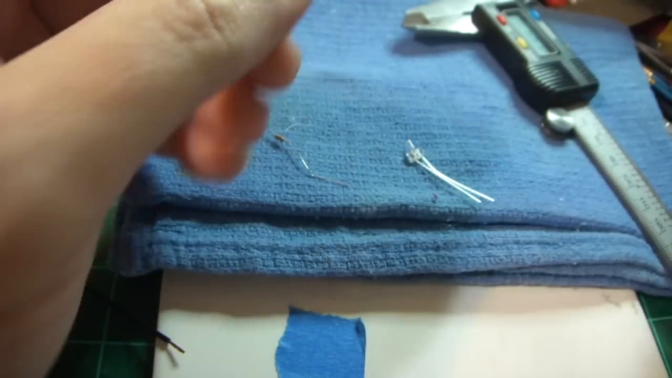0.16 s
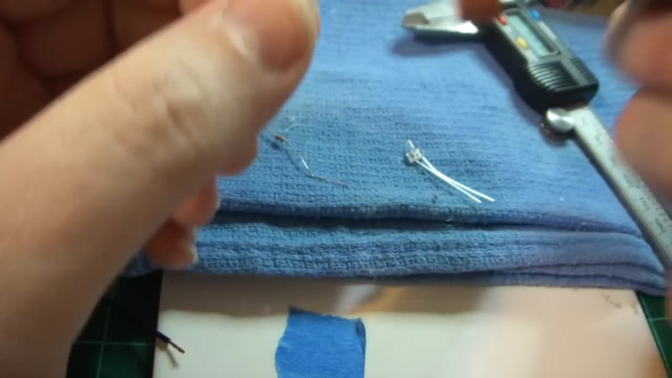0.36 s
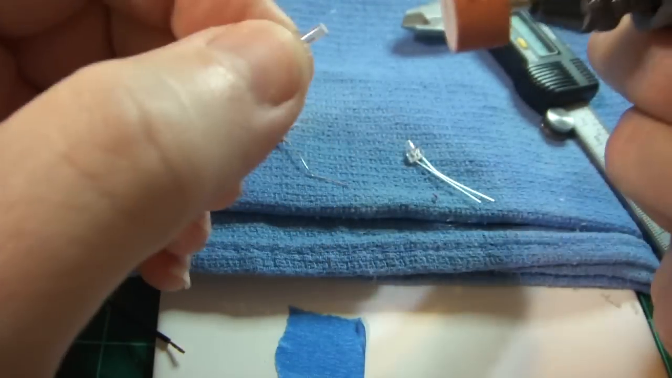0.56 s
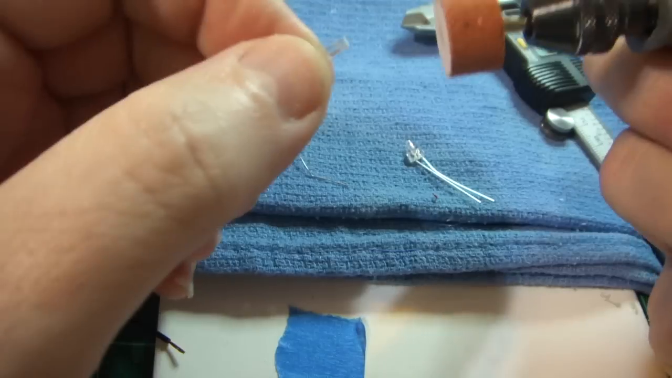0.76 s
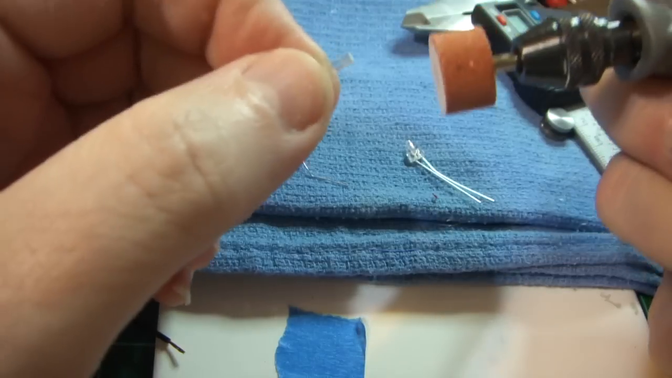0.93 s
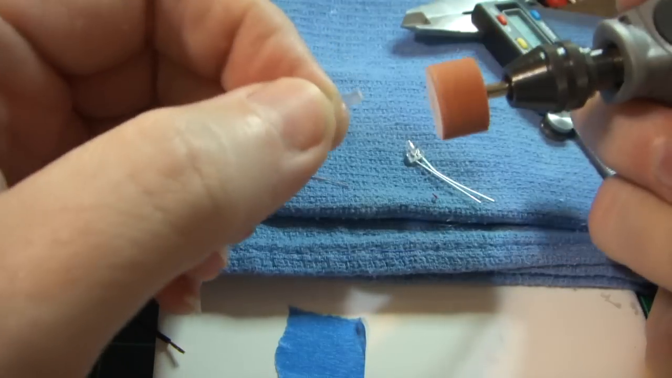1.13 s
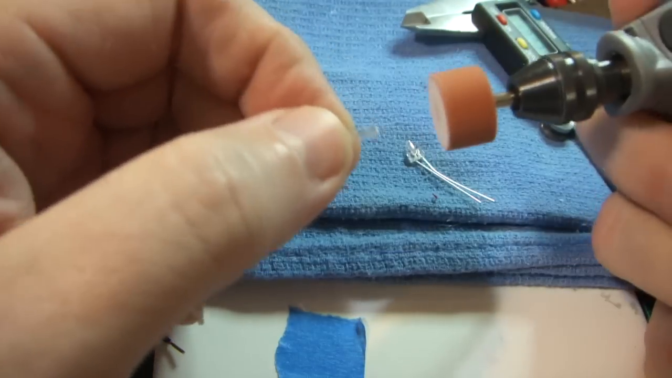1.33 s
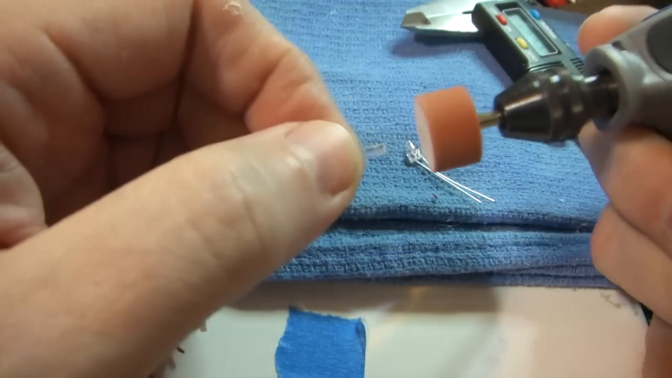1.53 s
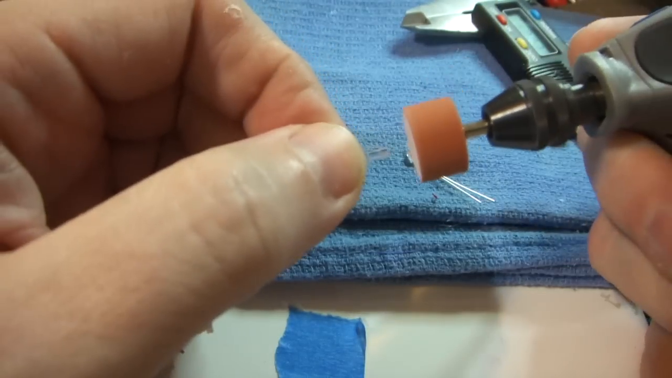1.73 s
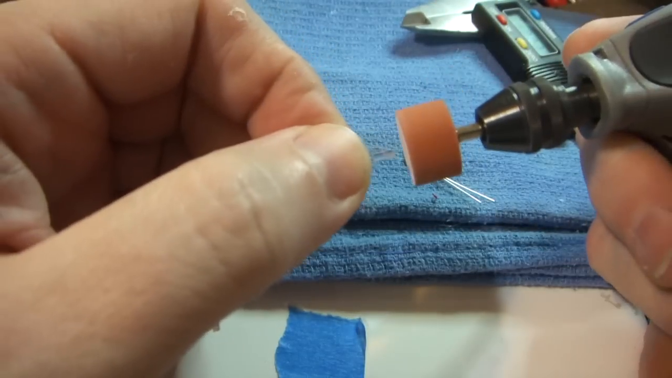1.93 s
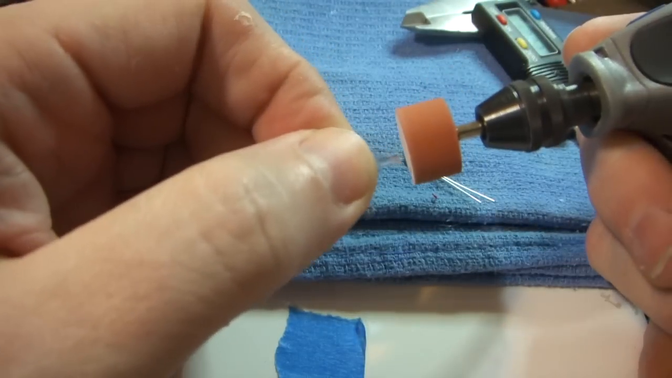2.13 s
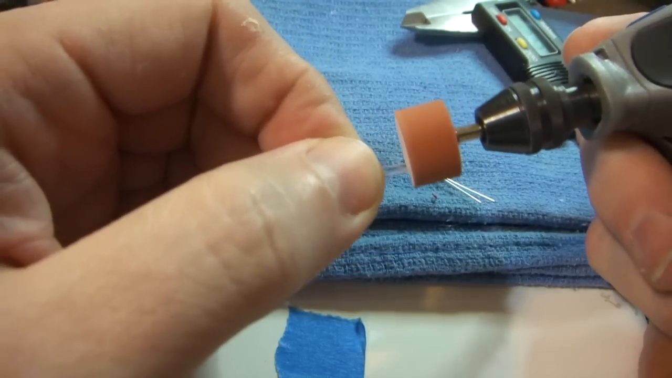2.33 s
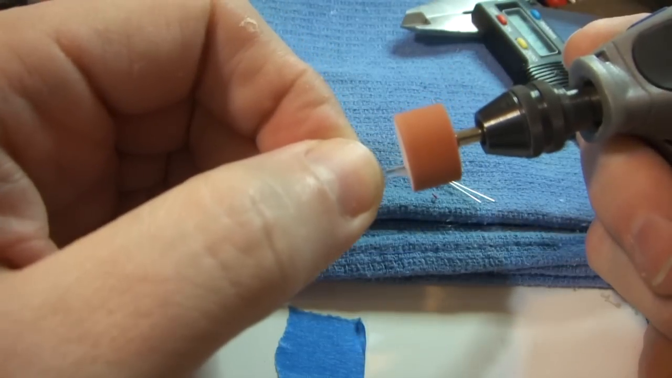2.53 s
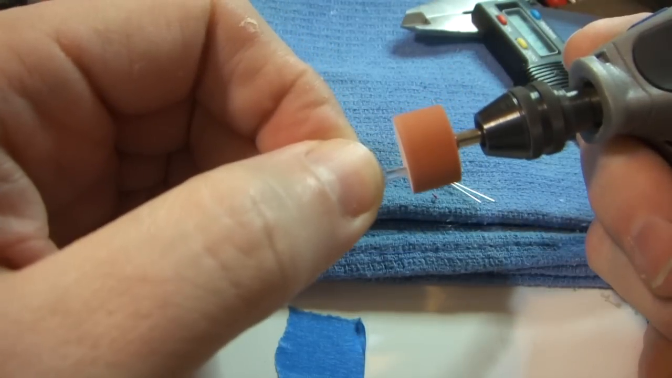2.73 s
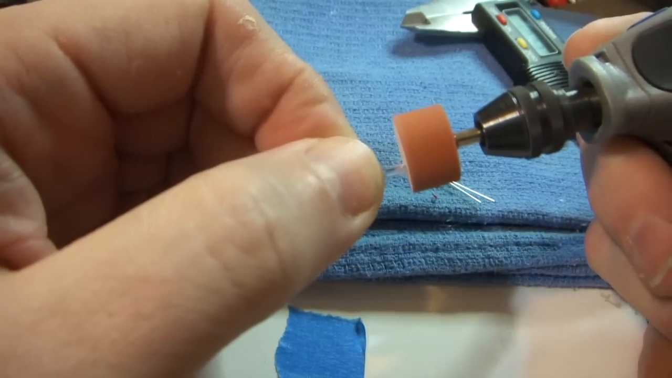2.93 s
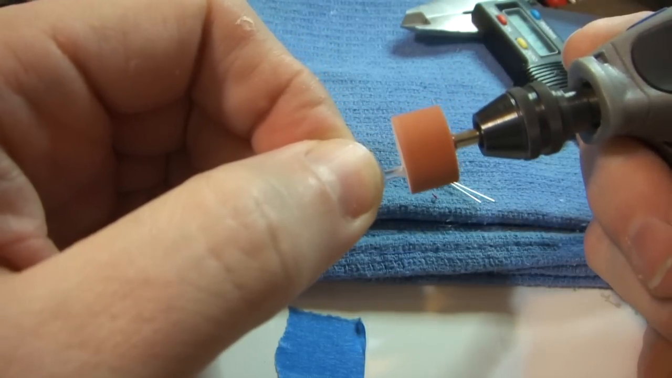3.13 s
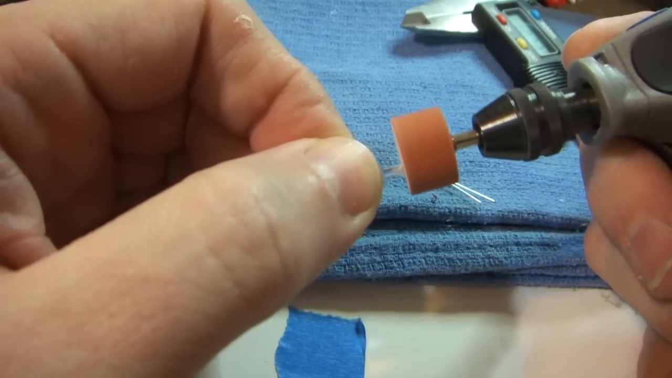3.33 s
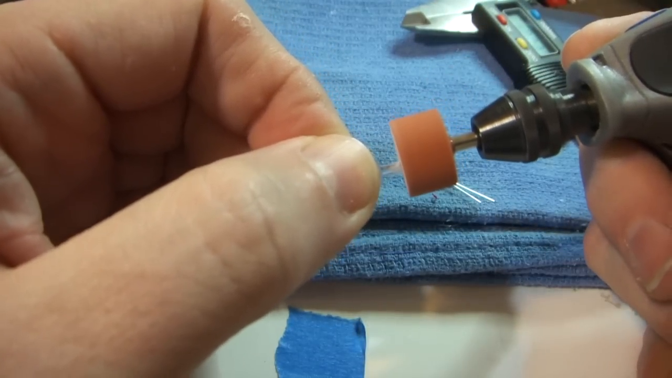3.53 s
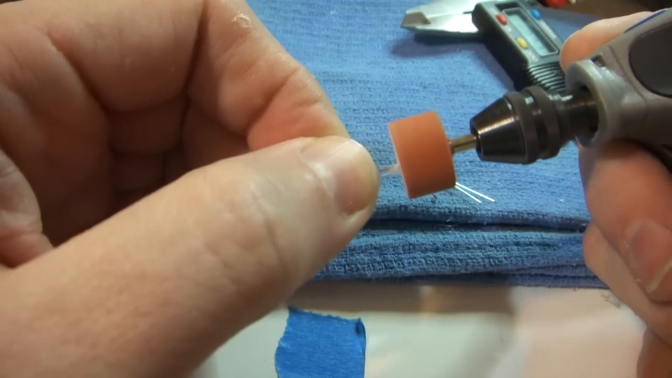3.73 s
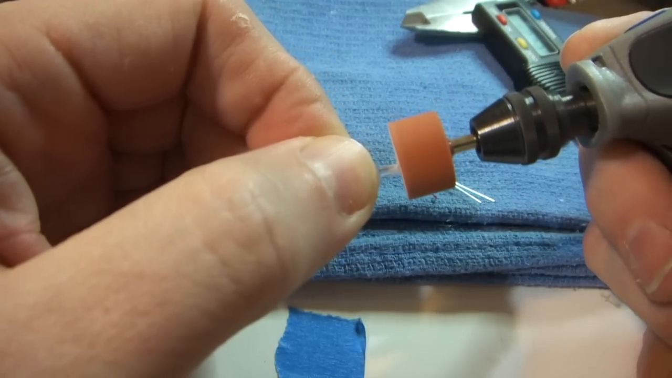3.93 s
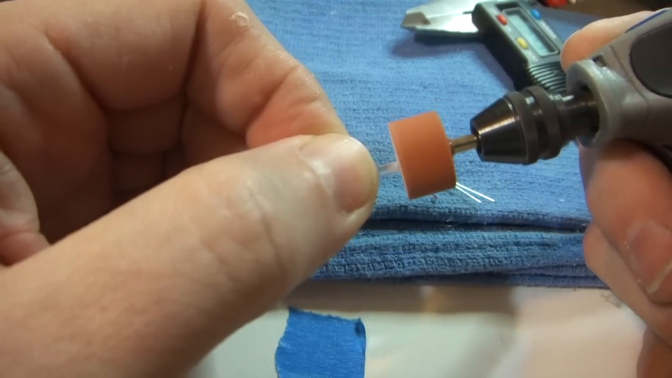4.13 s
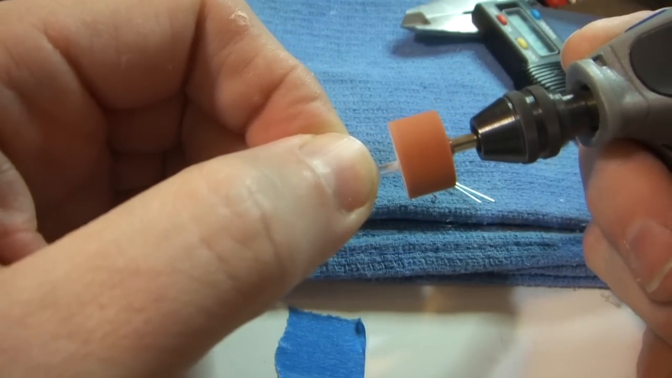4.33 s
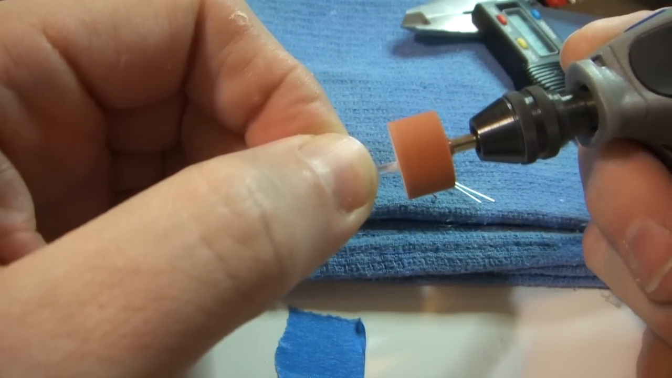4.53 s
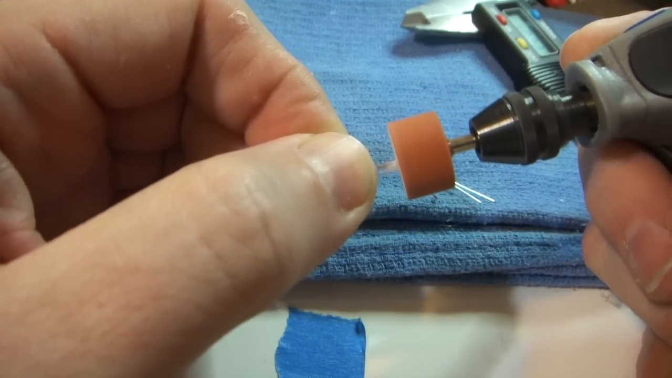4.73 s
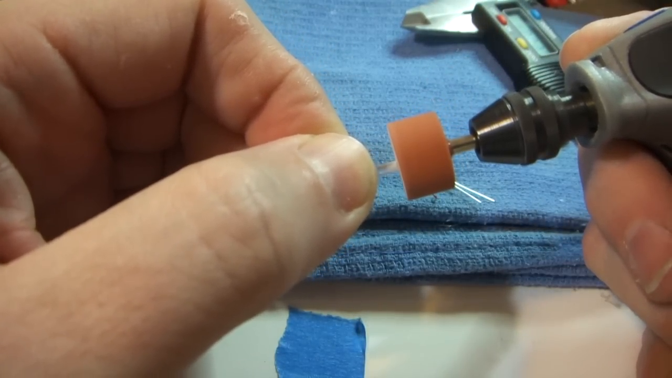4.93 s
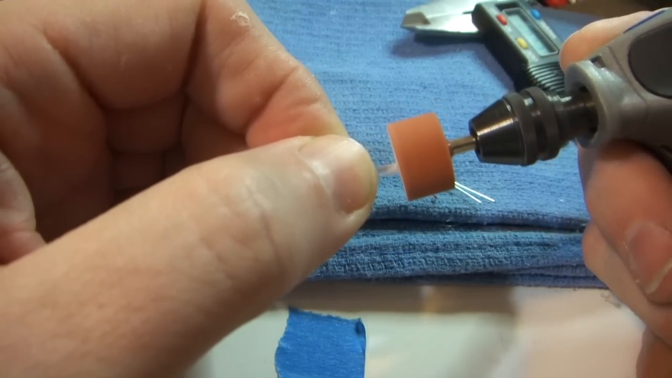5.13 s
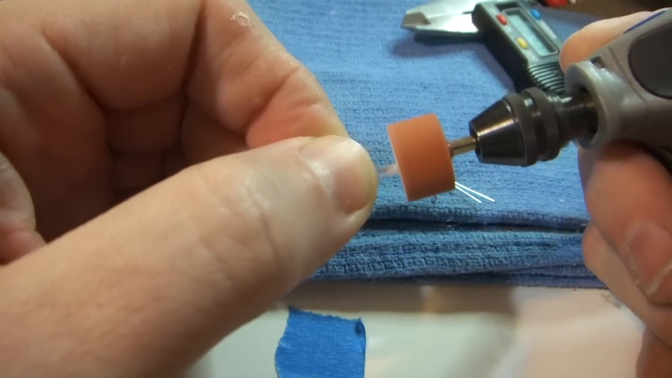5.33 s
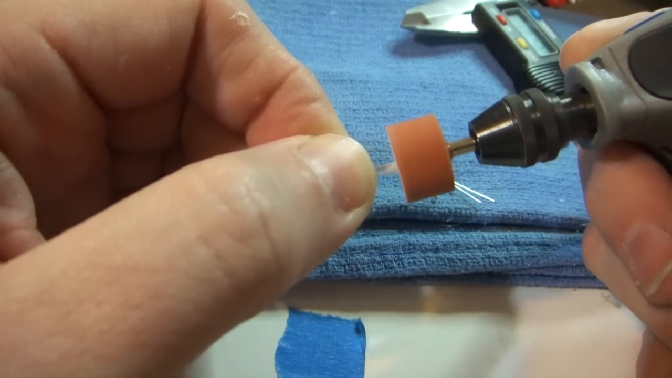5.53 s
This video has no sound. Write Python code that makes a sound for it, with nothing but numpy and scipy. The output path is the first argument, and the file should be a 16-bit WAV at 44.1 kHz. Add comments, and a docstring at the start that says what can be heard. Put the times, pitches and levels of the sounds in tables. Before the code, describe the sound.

A small rotary tool clicks on, whines up to speed, then its abrasive drum grinds a thin plastic stem with a buzzing, squealing rasp.

```python
"""On a work bench in a small room, close to the microphone, a small rotary tool starts up and grinds.
Fingers rustle as filtered noise, and button and fingernail clicks ring damped modes. The chopped motor current
whines in sum and difference lines that rise as the rotor spins up, while brushes and cooling air hiss.
The abrasive drum, slightly out of true, bites a thin plastic stem once a turn: each bite is a puff of grit noise
and a short burst of stick-slip squeals, and the drag of the stem slows the rotor."""
import sys
import numpy as np
from scipy import signal
from scipy.fft import rfft, irfft, next_fast_len
from scipy.io import wavfile
from scipy.ndimage import uniform_filter1d, map_coordinates

SR = 44100
rng = np.random.default_rng(int(sys.argv[2]) if len(sys.argv) > 2 else 0)


def master(y):
    """Save y as 16-bit WAV."""
    cut = np.clip(np.atleast_2d(y).T, -1, 1)
    pcm = np.round(cut * 32767)  # scale
    wavfile.write(sys.argv[1], SR, pcm.astype(np.int16))


N = 250047
TIME = np.arange(N) / SR
BINS_HZ = np.maximum(np.fft.rfftfreq(2 * next_fast_len(N // 2 + 4000), 1 / SR), 1)
SWITCH_ON_S, TOUCH_S = 1.056, 2.695
BITE_TURN = .944   # rotor angle at a bite's centre, in turns


def from_db(db):
    """Logarithmic level to amplitude gain: 20 dB is a factor of ten."""
    return 10 ** (np.asarray(db) / 20)


def rms_one(x):
    """Normalise the root-mean-square amplitude to 1."""
    return x / np.sqrt(np.mean(np.abs(x) ** 2) + 1e-20)


def in_time(rows):
    """Linear interpolation: each column of a curve, at every sample."""
    s, *columns = np.transpose(rows)
    return [np.interp(TIME, s, c) for c in columns]


def at_bins(points):
    """Interpolation over log frequency: a short spectrum joined by straight lines."""
    hz, value = np.transpose(points)
    return np.interp(np.log(BINS_HZ), np.log(hz), value)


def filtered(x, response):
    """Linear filtering: multiplication by a frequency response."""
    size = 2 * (len(BINS_HZ) - 1)
    return irfft(rfft(x, size) * response, size)[..., :N]


def coloured(x, spectrum):
    """Spectral shaping: filter x, with a skirt of 12 dB per octave below the lowest point; rms 1."""
    skirt = np.minimum(BINS_HZ / spectrum[0][0], 1) ** 2
    return rms_one(filtered(x, from_db(at_bins(spectrum)) * skirt))


def drift(knots_per_s):
    """Slow random modulation: random knots joined by straight lines; rms 1."""
    knots = rng.standard_normal(4000)
    return rms_one(np.interp(TIME * knots_per_s, np.arange(len(knots)), knots))


def resonate(x, hz, width_hz):
    """Heterodyne resonance: shift hz to zero, low-pass, shift back; the centre may move."""
    carrier = np.exp(2j * np.pi * np.cumsum(hz * np.ones(N)) / SR)
    r = np.exp(-np.pi * width_hz / SR)
    baseband = signal.lfilter([1 - r], [1, -r], x / carrier + 1e-18)
    return 2 * np.real(baseband * carrier)


def ring(taps, hz, t60):
    """Impulse response of a damped oscillator: a unit tap starts a decaying sine of height 1."""
    r, w = from_db(-60 / (t60 * SR)), 2 * np.pi * hz / SR
    return signal.lfilter([0, np.sin(w)], [1, -2 * r * np.cos(w), r * r], taps + 1e-18)


def puff(age, length):
    """Gaussian pulse: a brief rise and fall; both arguments in the same unit of time."""
    return np.exp(-.5 * (age / length) ** 2)


def swells(starts, lengths, heights, attack_s, release_s):
    """Trapezoidal envelopes: rise, hold and fall for each event; the highest counts at each instant."""
    envelopes = []
    for start, length, height in zip(starts, lengths, heights):
        rise = (TIME - start) / attack_s
        fall = 1 + (start + length - TIME) / release_s
        envelopes.append(height * np.clip(np.minimum(rise, fall), 0, 1))
    return np.max(envelopes, axis=0)


def ports(x):
    """Interaural-style cues: a near source reaches two ports with frequency-dependent level and phase."""
    # level difference of the two microphone ports: f/Hz, left - right level/dB
    balance = [(400, 0.5), (900, -4), (1250, -2.5), (1550, -2), (1950, 0.5), (2400, -1.5), (3000, -1),
               (3600, 5.5), (3950, -4.5), (4700, -1.5), (6250, 3.5), (6750, -1), (7300, -2), (8200, -1),
               (9400, -2)]
    # phase difference of the ports: f/Hz, lead of the left/rad
    phase_lead = [(400, 0.5), (1500, 0.39), (2100, -1), (3000, -1), (4000, -1.24), (4800, 1.5), (5200, -2),
                  (6000, 1.3), (7000, -2.5), (7400, 1.4), (8400, -1.36), (9400, -1.97)]
    side = np.array([[1], [-1]])
    gain = from_db(side * at_bins(balance) / 2)
    gain = gain / np.sqrt(np.mean(gain ** 2, axis=0))   # keep the mean power of the two ports
    return filtered(x, gain * np.exp(.5j * side * at_bins(phase_lead)))


def room_noise(level_db=-42):
    """Mid-side noise field: a steady low rush, its side part weakest in the middle of the spectrum."""
    # spectrum of the room noise: f/Hz, relative level per Hz/dB
    room_colour = [(25, -30), (50, -13), (80, -10.5), (120, 2), (155, -2.5), (205, 2.5), (260, -2.5),
                   (345, 4.5), (430, -2), (720, 1.5), (1100, -5), (2000, -9.5), (4000, -16.5), (7000, -21),
                   (10400, -31)]
    # stereo width of the room noise: f/Hz, side - mid level/dB
    room_width = [(30, 3), (70, -6), (150, -12), (500, -9), (1500, -6.5), (6000, 2)]
    mid, side = coloured(rng.standard_normal((2, N)), room_colour)
    side = filtered(side, from_db(at_bins(room_width)))
    return from_db(level_db) * (mid + side * [[1], [-1]])


def hands(grain_db=1.5, near_s=0.47, bump_s=1.325, bump_length_s=0.012, bump_db=-35, bump_hz=330,
          attack_s=0.016, release_s=0.018, fidget_db=-69):
    """Friction noise: skin rustles on plastic, a hollow hiss comes with the tool, the grip bumps once."""
    # fingers sliding on the work: start t/s, length/s, level/dB
    slides = [(0.06, 0.072, -49), (0.155, 0.15, -40), (0.51, 0.043, -48)]
    # spectrum of the rustle: f/Hz, relative level per Hz/dB
    rustle_colour = [(880, -34), (1500, -12), (2340, 0), (3080, -9), (3360, -5.5), (4290, -7), (7370, -7.5),
                     (10300, -10.5), (13400, -48), (22000, -120)]
    # resonances of the faint hollow hiss while the tool is near: f/Hz, width/Hz, rms level/dB
    hollow_modes = [(2100, 96, -52), (3450, 240, -58), (4080, 440, -55), (6740, 190, -68)]
    starts, lengths, slide_db = np.transpose(slides)
    sliding = swells(starts, lengths, from_db(slide_db), attack_s, release_s)
    sliding = sliding + from_db(fidget_db) * (TIME < SWITCH_ON_S)   # faint stirring until switch-on
    grains = rng.standard_normal(N) * from_db(grain_db * drift(600))
    rustle = sliding * coloured(grains, rustle_colour)
    hollow = sum(from_db(db) * rms_one(resonate(rng.standard_normal(N), hz, width))
                 for hz, width, db in hollow_modes)
    nearness = np.clip((TIME - near_s) / 0.055, 0, 1)
    bump = rms_one(resonate(rng.standard_normal(N), bump_hz, 250)) * puff(TIME - bump_s, bump_length_s)
    return rustle + hollow * nearness + from_db(bump_db) * bump


def clicks(low_hz=2900, high_hz=7600, body_hz=1500, body_db=-15):
    """Modal synthesis: snaps ring a small plastic part, band-limited by soft contact, over a weak body."""
    # button and fingernail clicks before filtering: t/s, level/dB, brightness/(dB per octave about 4500 Hz)
    taps_table = [(0.4188, -26, 40), (0.5496, -3.5, 21), (0.5496, -15, 18), (0.905, -35, 26), (.9739, 0, 5)]
    # modes they excite: f/Hz, relative level/dB, decay time t60/s
    modes = [(3330, -13, 0.011), (4130, -11.5, 0.01), (4460, -15, 0.0093), (5830, -7.5, 0.00086),
             (7400, -38, .002)]
    s, level_db, brightness_db = np.transpose(taps_table)
    ringing = np.zeros(N)
    for hz, mode_db, t60 in modes:
        taps = np.zeros(N)
        tilt_db = brightness_db * np.log2(hz / 4500)
        taps[np.round(s * SR).astype(int)] = from_db(level_db + mode_db + tilt_db)
        ringing += ring(taps, hz, t60)
    band = signal.butter(4, [low_hz, high_hz], "band", fs=SR, output="sos")
    return signal.sosfilt(band, ringing) + from_db(body_db) * resonate(ringing, body_hz, 1500)


def rotor_speed(break_free_s=1.084, full_turns_per_s=199, inertia_s=1.27,
                governor_s=1.7, set_turns_per_s=96.15, settle_s=.2):
    """First-order inertia: an exponential run-up, a governed approach to set speed, less the drag."""
    # speed lost to the drag of the stem: t/s, loss/(turns per s)
    drag = [(2.7, 0.0), (2.8, 0.69), (3.0, 4.96), (3.15, 3.58), (3.4, 7.85), (3.7, 12.2), (3.85, 11.31),
            (4.15, 10.93), (4.3, 12.61), (4.45, 13.26), (4.62, 16.59), (5.05, 18.79), (5.35, 21.02),
            (5.67, 27.37)]
    driven_s = np.clip(TIME, break_free_s, governor_s) - break_free_s
    run_up = full_turns_per_s * (1 - np.exp(-driven_s / inertia_s))
    settled = 1 - np.exp(-np.maximum(TIME - governor_s, 0) / settle_s)
    return run_up + settled * (set_turns_per_s - run_up) - in_time(drag)[0]


def whine(speed, turns, flicker_db=0.78, start_flicker_db=1.8, shake_turns=0.00072, swell_s=0.043,
          first_share=0.49, slow_speed=35, fast_speed=90, growth=5, housing_hz=1000, housing_width_hz=150,
          housing_db=36, thin_s=1.58, thin_length_s=0.18, thin_db=3.5):
    """Intermodulation: chopped current, cut by the commutator, sings in sum and difference lines."""
    # rate at which the speed control chops the current: t/s, f/Hz
    chop_rate = [(1.056, 1003), (1.13, 1055), (1.2, 1090), (1.3, 1127), (1.5, 1190), (1.6, 1219),
                 (1.7, 1252.6)]
    # whine lines, amplitude before the housing: multiple of chop rate, multiple of turn rate,
    # level/dB starting, level/dB running free, level/dB loaded
    lines = [(0, 1, -49, -55, -46), (0, 3, -65, -49, -47.5), (0, 9, -35, -29.5, -27),
             (0, 10, -49, -48.5, -60), (0, 11, -49, -44.5, -49), (0, 12, -32, -44, -60),
             (0, 15, -24, -39.5, -54), (0, 16, -41, -54, -31), (1, -3, -26, -31, -28.5),
             (1, -2, -40, -55.5, -43.5), (1, 0, -34, -38.5, -39), (1, 3, -28, -29, -31),
             (1, 6, -67, -42, -38.5), (2, -6, -61, -51, -41.5), (2, -3, -38, -40, -41),
             (2, 0, -31, -39.5, -40.5), (2, 3, -52, -33, -43), (2, 9, -46, -55.5, -49),
             (3, -9, -47, -44, -46), (3, -3, -37, -40.5, -39.5), (3, 0, -34.5, -50, -53),
             (3, 3, -41, -32.5, -35), (4, -3, -57, -59, -50), (4, 0, -44, -43, -45),
             (4, 3, -49.5, -47, -45.5), (5, -6, -46, -60, -54), (5, -3, -64, -42, -45),
             (5, 0, -46, -45.5, -51), (5, 3, -41, -43.5, -59), (5, 6, -56, -38, -50),
             (6, -3, -54, -64, -53), (6, 0, -45, -54, -56), (6, 3, -41.5, -57, -57),
             (7, -3, -47, -52.5, -47), (7, 0, -48, -46, -64), (7, 3, -46, -50, -59), (8, 0, -47, -74, -69)]
    # how the housing colours the whine: f/Hz, gain/dB
    housing = [(2000, 0), (2150, 1.5), (2900, 0), (3200, 0.5), (3550, -2), (4250, -2.5), (4700, 8),
               (5050, -4.5), (5420, 6.5), (5720, -5), (6100, 0), (6700, -1.5), (7700, -5), (8400, 5),
               (8900, -3)]
    chops = np.cumsum(in_time(chop_rate)[0]) / SR
    run_share = np.clip((speed - slow_speed) / (fast_speed - slow_speed), 0, 1)
    running = np.where(TIME > TOUCH_S, 1, run_share)
    load = (TIME > TOUCH_S) * (speed.max() - speed) / 22
    angle = turns + shake_turns * drift(60)
    age = np.maximum(TIME - SWITCH_ON_S, 0)
    # mechanical lines grow with speed; the chop's fundamental swells in, its overtones sooner
    mechanical = (speed / speed.max()) ** growth
    fundamental = np.minimum(age / swell_s, 1) ** 4
    overtones = np.minimum(age / 0.0044, 1) * np.minimum(first_share + age / 0.094, 1)
    onset = [mechanical, fundamental, overtones]
    out = np.zeros(N)
    for per_chop, per_turn, start_db, free_db, loaded_db in lines:
        m, k = round(per_chop), round(per_turn)
        # overtones flutter more during the run-up
        flutter_db = flicker_db + start_flicker_db * (1 - running) * (m > 1)
        level_db = start_db + running * (free_db - start_db) + load * (loaded_db - free_db)
        level_db = level_db + flutter_db * drift(40)
        if m > 1:   # the overtones thin out near the end of the run-up
            level_db = level_db - thin_db * puff(TIME - thin_s, thin_length_s)
        if m == 0:   # a mechanical line flares as it sweeps through the housing's main resonance
            detuning = (k * speed - housing_hz) / housing_width_hz
            level_db = level_db + housing_db * (1 - running) / (1 + detuning ** 2)
        cycles = m * chops + k * angle
        out += from_db(level_db) * onset[min(m, 2)] * np.cos(2 * np.pi * (cycles + rng.random()))
    return filtered(out, from_db(at_bins(housing)))


def brushes(speed, turns, hiss_db=-32.0, buzz_db=-39, diffuse_db=-41, growth=0.75, throb=0.15):
    """Friction noise growing with speed: a hiss throbs thrice a turn, a scratch repeats every turn."""
    # spectrum of brushes and cooling air: f/Hz, relative level per Hz/dB
    brush_colour = [(200, -55), (600, -4), (1100, 2.5), (1900, 3.5), (2600, -4), (3300, 1.5), (3700, -3.5),
                    (4400, 6), (5200, -6), (6300, 2.5), (7200, 0.5), (8450, 0), (8850, -1), (9500, 0.5),
                    (10400, -15.5)]
    gain = (speed / speed.max()) ** growth
    track = rng.standard_normal(SR // 96)   # the scratch of one turn
    buzz = coloured(np.interp(turns % 1, np.linspace(0, 1, len(track)), track), brush_colour)
    throbbing = 1 + throb * np.cos(6 * np.pi * turns)
    hiss = coloured(rng.standard_normal(N) * throbbing, brush_colour)
    diffuse = coloured(rng.standard_normal((2, N)), brush_colour)
    near = ports(from_db(hiss_db) * hiss + from_db(buzz_db) * buzz)
    return gain * (near + from_db(diffuse_db) * diffuse)


def bites(speed, turns, lead=0.332):
    """Phase locking to the rotor: each sample's bite number, and its time from that bite's centre in ms."""
    bite = np.floor(turns - BITE_TURN + lead).astype(int) + 1
    return bite, 1000 * (turns - BITE_TURN - bite + 1) / np.maximum(speed, 1)


def evened(x, bite):
    """Power normalisation: bring every bite to about the same rms of 1."""
    count = np.maximum(np.bincount(bite), 1)
    power = np.bincount(bite, x ** 2) / count
    return x / np.sqrt(uniform_filter1d(power[bite], size=128) + 1e-12)


def abrasive(turns, renew_per_s=9, fresh=0.75):
    """Cyclic noise: the same grains pass each turn, gradually giving way to others; chips add fresh noise."""
    grains = rng.standard_normal((256, SR // 84))
    position = [TIME * renew_per_s, turns % 1 * grains.shape[1]]
    track = map_coordinates(grains, position, order=3, mode="grid-wrap")
    return rms_one(track + fresh * rng.standard_normal(N))


def squeal(force, cycles, hz, width_hz, rough, slip_radians, turns, bite):
    """Forced resonance: a stick-slip tone, roughened by the abrasive, drives one mode of the stem."""
    slip = slip_radians * rng.standard_normal(bite.max() + 1)[bite]
    tone = np.sqrt(2) * np.cos(2 * np.pi * cycles + slip)
    scratch = rms_one(resonate(abrasive(turns), hz, width_hz))
    return resonate(force * (tone + rough * scratch), hz, width_hz)


def stem_squeal(speed, turns, width_hz=520, rough=0.28, rebound_ms=4.5, rebound_length_ms=1.1,
                slip_radians=0.18, stiffen_hz=370, stiff_ms=1.48, relax_ms=0.33,
                choke=0.72, choke_turn=0.3, choke_ms=0.65):
    """Stick-slip: sharp while the drum holds the stem, falling as it slips; rebound, then choked ring."""
    # low squeal of the stem: t/s, f/Hz, delay of the bite/ms, length of the bite/ms,
    # rebound level/dB and chafing level between bites/dB, both relative to the bite
    stem = [(2.72, 1890, 0.26, 1.1, -27, -24), (2.79, 2030, 0.46, 0.43, -19, -25),
            (2.86, 1950, 0.2, 0.73, -13, -22), (2.91, 1940, -0.29, 2.7, -2, -14),
            (2.96, 1880, 0.089, 1.4, -8, -18), (3.0, 1876, 0.85, 1.3, -21, -24),
            (3.15, 1847, 0.13, 1.44, -24, -30), (3.2, 1913, -1.5, 0.81, -2, -3),
            (3.28, 1910, -1.5, 1.4, -25, -18.5), (3.35, 1890, -0.97, 1.9, -7, -1),
            (3.42, 1860, -0.41, 1.8, -3, -10), (3.57, 1826, -.6, 2.2, -15, -6),
            (3.62, 1915, -1.8, 1.1, -17, -9), (3.68, 1763, 0.98, 1.3, -11, 1),
            (3.8, 1873, 1.4, 1.9, -17, -7), (4.06, 1790, 1.6, 0.81, -16, 1),
            (4.24, 1775, 0.014, 1.2, -8, 1), (4.32, 1850, -0.4, 1.1, -17, -20),
            (4.43, 1756, -0.77, 2, -19, -10), (4.55, 1817, 0.06, 1.1, -11, -24),
            (5.3, 1842, 0.64, 0.7, -10, -11)]
    bite, age_ms = bites(speed, turns)
    hz, delay_ms, length_ms, rebound_db, chafe_db = in_time(stem)
    force = puff(age_ms - delay_ms, length_ms) + from_db(chafe_db)
    force = force + from_db(rebound_db) * puff(age_ms - rebound_ms, rebound_length_ms)
    held = (np.minimum(delay_ms, length_ms / 2) - stiff_ms - age_ms) / relax_ms
    rise_hz = stiffen_hz * (1 + np.tanh(held / 2)) / 2
    # the phase is the time integral of the base pitch plus the falling rise
    cycles = (hz * age_ms - stiffen_hz * relax_ms * np.logaddexp(0, held)) / 1000
    # the returning drum touches the stem shortly before the next bite
    return_turn = (turns - BITE_TURN + choke_turn + .5) % 1 - .5
    return_ms = 1000 * return_turn / np.maximum(speed, 1)
    free = 1 - min(choke, 1) * puff(return_ms, choke_ms)
    tone = squeal(force, cycles, hz + rise_hz, width_hz, rough, slip_radians, turns, bite)
    return evened(free * tone, bite)


def grinding(speed, turns, grit_ms=1.47, grit_delay_ms=0.16, graze=0.16, grain_db=2, rasp_db=-11.5,
             rasp_ms=1.7, apart=0.6, grit_follows=0.77, catch_ms=0.66, bite_spread_db=0.68,
             slip_radians=0.47, chafe=0.025, tremor_db=0.2, tremor_per_s=25, grit_rest_db=-28.5):
    """Periodic contact: once a turn the drum catches the stem, grit crackles and the stem squeals."""
    # the hand pushes the stem into the drum: start t/s, length/s, rise of the low squeal level/dB,
    # rise of the upper squeals' level/dB (grit takes a share); rises below 0 have no effect
    pushes = [(2.664, 0.053, 11.5, -3.5), (2.743, 0.026, 9.5, 0), (2.82, 0.062, 8.5, 7.5),
              (2.87, 0.075, 8, 4), (2.93, 0.028, 11, 7), (3.006, 0.067, 8.5, -2.5), (3.094, 0.055, 8.5, -2),
              (3.186, 0.066, 4, 2), (3.239, 0.05, 9, 1.5), (3.258, 0.032, 11, 5.5), (3.372, 0.12, 5, 3.5),
              (3.491, 0.075, 10, 3.5), (3.555, 0.037, 3, 6.5), (3.615, 0.075, 3.5, 3), (3.725, 0.014, 0, 3),
              (3.871, 0.04, 1, 9), (3.947, 0.024, -4.5, 2.5), (4.064, 0.235, -2, 6),
              (4.16, 0.028, -0.5, 10), (4.235, 0.21, 7.5, 3), (4.41, 0.022, 0, 1.5), (4.461, 0.034, -7, 8),
              (4.5, 0.027, 4.5, 3.5), (4.699, 0.14, 0.5, 6), (4.752, 0.02, -6, 7), (4.904, 0.056, 5.5, 3.5),
              (4.949, 0.16, 3, 8), (5.252, 0.093, -2, 10.5), (5.395, 0.025, 4, 9), (5.462, .03, 1, 6.5),
              (5.489, 0.13, -12.5, 9)]
    # the hand eases off for a moment: t/s, length/s, drop of the upper squeals' level/dB (low squeal: half)
    eases = [(3.024, 0.006, 6), (3.083, 0.008, 8), (3.186, 0.015, 3.5), (3.607, 0.01, 2.5),
             (3.853, 0.019, 6.5), (4.055, 0.009, 4), (4.275, 0.007, 4), (4.492, 0.0072, 9),
             (4.676, 0.012, 5), (5.245, 0.012, 5)]
    # low squeal between pushes: t/s, level/dB
    stem_rest = [(2.7, -30.5), (3.1, -23), (3.2, -23), (3.4, -23), (3.57, -28), (3.8, -22), (4.18, -25.5),
                 (4.3, -27.5), (4.46, -29.5), (4.58, -21), (4.87, -25), (5.05, -30), (5.25, -25),
                 (5.55, -34), (5.67, -31)]
    # first catch of the drum on the stem: t/s, lead before the bite's centre/ms, strength relative to the bite
    first_catch = [(2.85, 2.4, 0.42), (3.25, 2.7, 0.55), (3.6, 1.8, 0.54), (4.1, 1.6, 0.43),
                   (4.5, 1.2, 1.6), (5.0, 1.2, 0.9), (5.5, 1.5, 0.58)]
    # spectrum of the abrasive grit: f/Hz, relative level per Hz/dB
    grit_colour = [(600, -7.5), (1300, -3), (2300, 2.5), (2700, 1), (3700, -5), (4600, 5.5), (5400, -6),
                   (6500, 7), (7050, 5.5), (8000, 5.5), (8800, 4), (9500, 13.5), (10400, -3)]
    # spectrum of the coarse rasp of a hard-pressed stem: f/Hz, relative level per Hz/dB
    rasp_colour = [(1100, -10.5), (1600, -7), (2220, 5.5), (2650, -10.5), (2900, -3), (3600, -11),
                   (4500, -5), (5400, -10), (10400, -23)]
    # squeals shifting with the point of contact: t/s, middle f/Hz, top f/Hz
    squeal_pitch = [(2.7, 2870, 7400), (3.1, 2870, 7000), (3.35, 2860, 6160), (3.59, 3140, 6280),
                    (3.62, 3500, 7540), (4.2, 3520, 7100), (4.47, 3480, 7620), (4.95, 3450, 7870),
                    (5.04, 3450, 7770), (5.55, 3450, 8670), (5.67, 3440, 7400)]
    # wavering scrape between those two: t/s, f/Hz
    scrape_pitch = [(2.7, 4250), (3.15, 4100), (3.35, 4800), (3.7, 4380), (4.42, 3980), (4.52, 4200),
                    (4.61, 4330), (4.68, 4270), (4.761, 4100), (4.82, 4120), (4.88, 4450), (4.94, 4320),
                    (5.0, 3940), (5.08, 4080), (5.14, 4270), (5.29, 4180), (5.33, 4270), (5.43, 4260),
                    (5.49, 4410), (5.53, 4250), (5.6, 4250), (5.63, 4620), (5.67, 4800)]
    # levels between pushes, as the stem wears down: t/s, middle level/dB, scrape level/dB, top level/dB
    squeal_rest = [(2.7, -37, -49, -29), (2.8, -31, -41, -45), (2.92, -45, -41, -42), (3.1, -45, -42, -50),
                   (3.2, -36, -45, -39.5), (3.57, -33.5, -52, -32), (3.63, -37, -39, -33),
                   (3.68, -28, -46, -36), (3.8, -40, -43, -46), (3.95, -30.5, -43, -33),
                   (4.1, -32.5, -53, -38), (4.2, -31.5, -52, -35), (4.46, -35.5, -33, -31.5),
                   (4.56, -32.5, -27.5, -35.5), (4.8, -47.5, -31.5, -37.5), (4.95, -39, -28, -37.5),
                   (5.03, -43, -41, -31), (5.12, -45, -28.5, -39.5), (5.22, -38, -30.5, -40),
                   (5.29, -49.5, -31, -40), (5.42, -46, -30, -50), (5.52, -55, -28.5, -35),
                   (5.6, -52, -32.5, -45), (5.64, -55, -33, -42), (5.67, -57, -22, -33)]
    # rows middle, scrape, top: delay after the bite's centre/ms, length/ms, resonance width/Hz, roughness
    squeal_shapes = [(0, 1.7, 920, 1.03), (-0.08, 1.23, 650, 0.75), (0.035, 0.91, 860, 1.1)]

    starts, lengths, bend_rise_db, edge_rise_db = np.transpose(pushes)
    eased_db = sum(drop_db * puff(TIME - s, length_s) for s, length_s, drop_db in eases)
    # the whole stem bends slowly, its edge catches sooner: attack and release in s
    press_db = in_time(stem_rest)[0] - eased_db / 2 + swells(starts, lengths, bend_rise_db, 0.016, 0.04)
    edge_db = swells(starts, lengths, edge_rise_db, 0.011, 0.025) - eased_db
    edge_db = edge_db + tremor_db * drift(tremor_per_s)
    bite, age_ms = bites(speed, turns)
    ahead_ms, catch = in_time(first_catch)
    caught_ms = age_ms + ahead_ms
    touching = TIME > TOUCH_S
    out = from_db(press_db) * stem_squeal(speed, turns)

    grit_db = grit_rest_db + grit_follows * edge_db
    for level_db, length_ms, colour in [(grit_db, grit_ms, grit_colour),
                                        (press_db + rasp_db, rasp_ms, rasp_colour)]:
        # between bites the drum only grazes
        bitten = (caught_ms > 0) * puff(age_ms - grit_delay_ms, length_ms)
        force = touching * (graze + catch * puff(caught_ms, catch_ms) + bitten)
        # chips fly off all around, so each side hears some of its own
        grains = abrasive(turns) + apart * rng.standard_normal((2, N))
        grains = grains * from_db(grain_db * drift(700))
        # rms 1 over the time of contact rather than over the whole sound
        noise = coloured(grains * force, colour) * np.sqrt(np.mean(touching))
        out = out + from_db(level_db) * noise

    middle_hz, top_hz = in_time(squeal_pitch)
    pitches = [middle_hz, in_time(scrape_pitch)[0], top_hz]
    for rest_db, hz, shape in zip(in_time(squeal_rest), pitches, squeal_shapes):
        delay_ms, length_ms, width_hz, rough = shape
        force = chafe + puff(age_ms - delay_ms, length_ms)
        cycles = hz * age_ms / 1000
        tone = squeal(force, cycles, hz, width_hz, rough, slip_radians, turns, bite)
        out = out + from_db(rest_db + edge_db) * evened(tone, bite)
    bite_gain = from_db(bite_spread_db * rng.standard_normal(bite.max() + 1))
    return out * touching * bite_gain[bite]


def bench(x):
    """Early reflection: near surfaces return delayed copies, at different times at the two ports."""
    # reflections: delay at the left port/s, delay at the right port/s, level/dB
    echoes = [(.0021, .0025, -21), (.0093, 0.0058, -21)]
    out = 0
    for left_s, right_s, db in echoes:
        delayed = [np.interp(TIME - delay, TIME, side) for delay, side in zip((left_s, right_s), x)]
        out = out + from_db(db) * np.array(delayed)
    return out


def reverb(x, t60):
    """Diffuse reverberation: exponentially decaying noise, different on each side, convolved with x."""
    age = TIME[:SR // 3]
    tail = rng.standard_normal((2, len(age))) * from_db(-60 * age / t60) * (age > .003)
    return signal.fftconvolve(x, tail / np.sqrt(np.sum(tail ** 2) / 2), axes=1)[:, :N]


def scene(wet_db=-19, room_t60=0.095, click_wet_db=-27):
    """Superposition: the rotor's angle times the whine, the brushes and the bites; all sounds add."""
    # gain of the steady sounds, which dip around 3.3 to 3.5 s: t/s, level/dB
    steady_level = [(0, 1), (1.1, 0.5), (1.5, 2.3), (2.0, 2), (2.7, 1.5), (3.0, 2.5), (3.3, -2.5),
                    (3.52, -1.5), (3.75, 3.5), (4.4, 2.5), (5.0, 2), (5.67, 2)]
    speed = rotor_speed()
    turns = np.cumsum(speed) / SR
    steady = ports(whine(speed, turns) + hands()) + brushes(speed, turns) + room_noise()
    grind, snaps = grinding(speed, turns), clicks()
    direct = ports(grind + snaps)
    tail = reverb(from_db(wet_db) * grind + from_db(click_wet_db) * snaps, room_t60)
    return from_db(in_time(steady_level)[0]) * steady + direct + bench(direct) + tail


def record(dry, ceiling=.75, cutoff_hz=10400):
    """Saturation and band limiting: peaks round off below a ceiling, then a steep low-pass at the cut-off."""
    rounded = dry / (1 + (dry / ceiling) ** 6) ** (1 / 6)
    low_pass = signal.ellip(8, .3, 70, cutoff_hz, fs=SR, output="sos")
    return signal.sosfilt(low_pass, rounded)


dry = scene()
out = record(dry)
master(out)
```